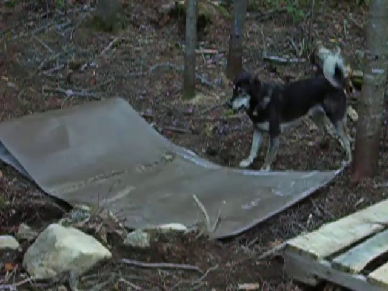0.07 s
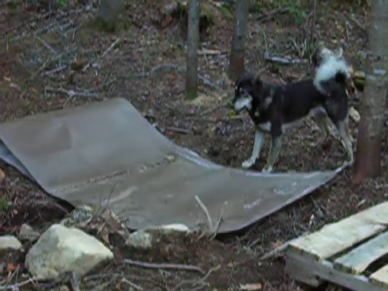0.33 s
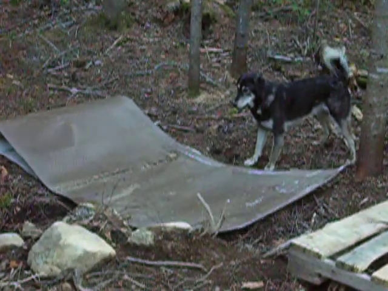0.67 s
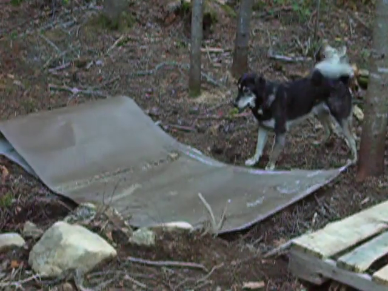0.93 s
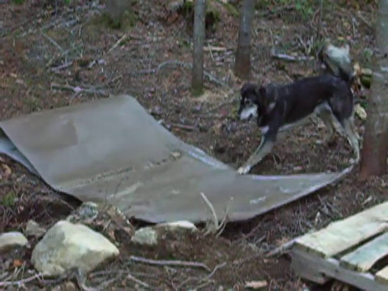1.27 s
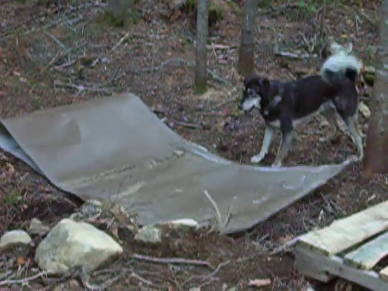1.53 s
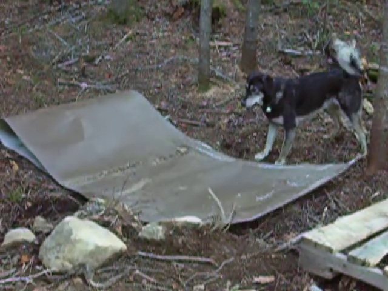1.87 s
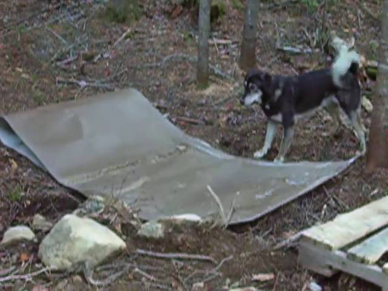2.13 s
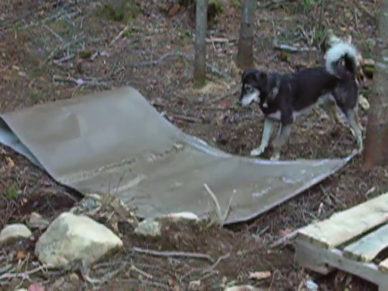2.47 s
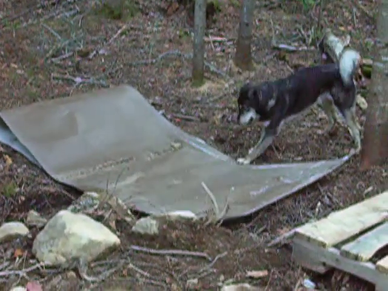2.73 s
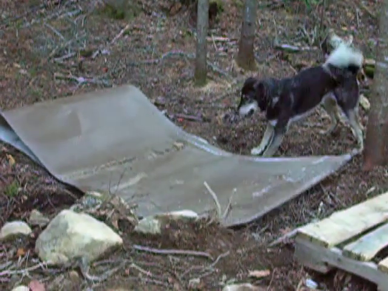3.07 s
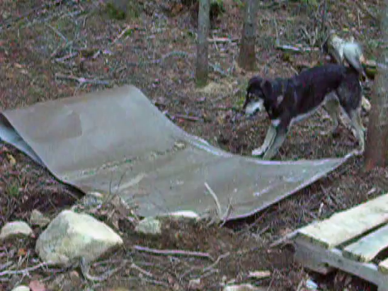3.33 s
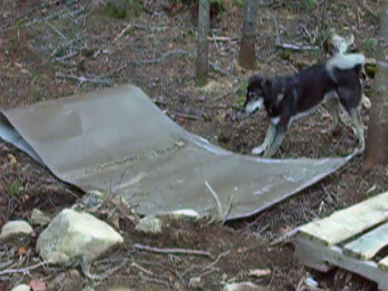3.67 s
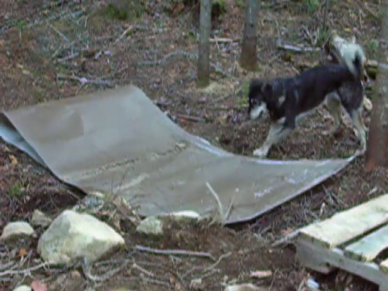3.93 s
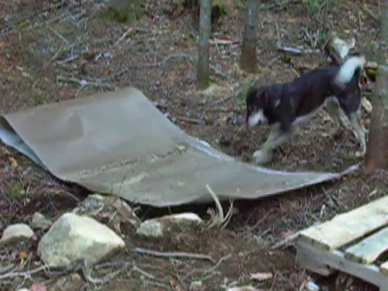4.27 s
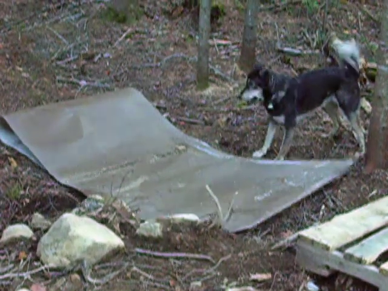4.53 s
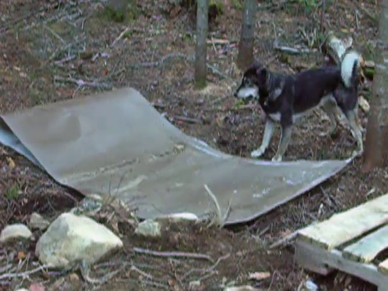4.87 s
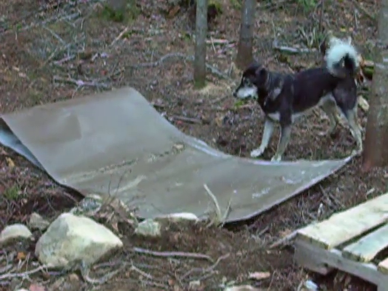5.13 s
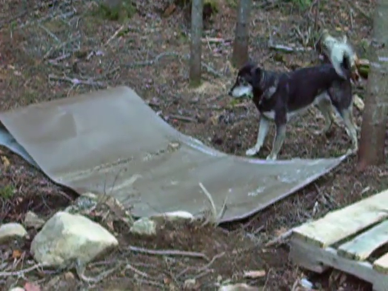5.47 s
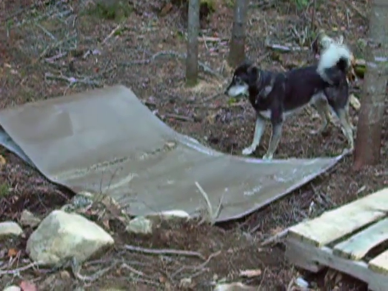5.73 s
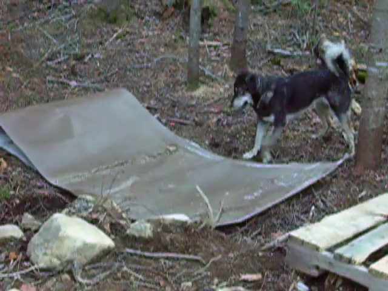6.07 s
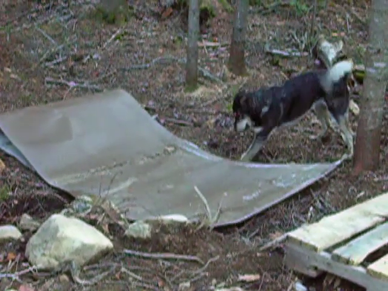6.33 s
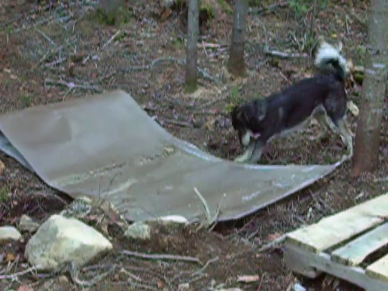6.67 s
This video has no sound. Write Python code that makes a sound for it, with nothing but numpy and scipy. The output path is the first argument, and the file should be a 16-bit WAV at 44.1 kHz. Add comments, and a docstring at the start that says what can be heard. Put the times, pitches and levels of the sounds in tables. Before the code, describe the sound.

A dog paws at a large thin metal sheet on the ground in a quiet wood. Each push brings thuds and short clangs, then a wobbling rumble like stage thunder that rings out. The bursts come four times with short lulls, the fourth loudest and longest, and one more clang comes at the end. A few twigs crack faintly. The microphone sounds dull, with a steady hiss and a few thin clicks.

```python
"""A large, thin, bowed metal sheet rumbles like stage thunder as a dog paws at it on the ground.
Each push makes the plate buckle and excites its dense bending modes, which glide in pitch and ring out.
Claws and edges strike it, and each impact sets the same modes ringing as a thud and a short clang.
Twigs crack under the paws, over the steady hiss of the still air of a wood and of the microphone,
which is narrow in band, overloads on the highest crests and adds a few thin clicks."""
import sys
import numpy as np
from scipy import signal
from scipy.fft import rfft, irfft, next_fast_len
from scipy.io import wavfile
from scipy.ndimage import uniform_filter1d, map_coordinates

SR = 44100
rng = np.random.default_rng(int(sys.argv[2]) if len(sys.argv) > 2 else 0)


def waveform_to_disk(signal):
    """Save audio, clipped to [-1, 1], as 16-bit WAV at the path in sys.argv[1]."""
    frames = np.transpose(np.atleast_2d(signal))
    scaled = np.clip(frames, -1, 1) * 32767
    samples = np.round(scaled).astype(np.int16)
    wavfile.write(sys.argv[1], SR, samples)


N = 295470
TIME = np.arange(N) / SR
RING_SAMPLES, CUTOFF_HZ = 36000, 15800

# Still air and microphone hiss. Each row: frequency in Hz, relative spectral density in dB.
HISS_SPECTRUM = [(20, -6.5), (55, -4.5), (85, 4.5), (130, 0), (220, 2.5), (380, 5), (800, 1), (1800, -2.5),
                 (3200, -3), (3800, -8.5), (4200, -21)]
# Thin, bright clicks. Each row: start in seconds, step height in dB.
CLICK_STEPS = [(3.387, -21), (4.57, -25), (4.639, -36), (4.692, -25.5)]
# Twigs cracking under the paws. Each row: start in seconds, relative level in dB.
TWIG_CRACKS = [(0.9694, -47), (2.5994, -58), (2.7164, -42), (2.8877, -33), (2.9024, -41), (6.3024, -47)]
# Damping of the sheet's modes. Each row: frequency in Hz, time to decay by 60 dB in seconds.
DECAY_TIMES = [(100, 0.91), (400, 1), (900, 0.76), (1500, 0.75), (3500, 0.4)]
# Four spectral envelopes of the sheet. Each row: frequency in Hz, relative mode strength in dB.
THUD_SPECTRUM = [(60, -32.5), (140, -12.5), (220, -7), (320, -8.5), (400, -4), (520, -1), (680, -3),
                 (820, 3), (1000, -2), (1200, -11), (1800, -26), (4000, -50)]
CLANG_SPECTRUM = [(500, -17), (1000, 2.5), (1400, 9.5), (1900, 0), (2450, 6.5), (2900, 5), (3200, 3),
                  (3700, -5), (4300, -22.5)]
BOOM_SPECTRUM = [(50, -29.5), (75, -34.5), (105, -7.5), (170, 1.5), (210, 3), (250, 5), (300, 3.5),
                 (380, -51)]
RUMBLE_SPECTRUM = [(230, -22.5), (290, -13.5), (350, 3), (450, 1), (560, 0), (680, -6.5), (790, -0.5),
                   (950, -4.5), (1080, -15), (1250, -21), (1400, -25), (1800, -39.5), (2500, -39),
                   (4200, -53.5)]
# Claws and edges striking the sheet. Each row: start in seconds, relative clang level in dB,
# relative thud level in dB, rise time in seconds, clang tilt in dB per octave.
IMPACTS = [(0.0, -34, -42, 0.0026, -6), (.032, -36.5, -30, 0.01, -3), (.418, -39, -25.5, 0.0058, -.5),
           (0.693, -53, -32, 0.0086, 4), (1.495, -53.5, -37.5, 0.0036, 2.5),
           (1.528, -30, -24.5, 0.012, 2.5), (1.552, -33, -18.5, 0.0052, -3), (1.641, -23.5, -29, .005, 8.5),
           (1.657, -29.5, -19.5, 0.0035, 1), (1.88, -33.5, -19, .002, 1), (2.012, -40, -35.5, 0.004, 5),
           (2.097, -39.5, -37, 0.0081, -1.5), (3.001, -56.5, -32, 0.015, 1),
           (3.032, -29, -19.5, 0.008, 0.5), (3.056, -32, -14, 0.0015, 1.5),
           (3.16, -30.5, -15, 0.0074, -0.5), (3.385, -36, -26, 0.00083, -.5),
           (3.597, -34.5, -31, 0.0055, -2), (3.786, -42.5, -27, 0.00203, 2),
           (4.428, -24.5, -11.5, 0.012, -1), (4.565, -19.5, -5.5, 0.0032, -3.5),
           (4.588, -26, -14.5, 0.0042, -0.5), (4.622, -32.5, -10.5, 0.0034, -8.5),
           (4.803, -32, -9.5, 0.0065, -1.5), (4.93, -33, -14.5, 0.0089, -2), (5.046, -33, -37, .002, 1),
           (5.215, -44.5, -19, .006, 6.5), (5.541, -43, -30, 0.0087, 2), (6.552, -62, -31.5, 0.0013, -3),
           (6.5671, -22.5, -19, 0.0018, -3)]
# The paws bend the sheet, lean in and let go. Each row: start and length in seconds, rumble and boom
# levels in dB, growth while held in dB per second, decay of the rumble on release in dB per second.
PAW_PUSHES = [(0.02, 0.063, -20.5, -32, -5, 65.5), (1.55, 0.18, -20, -30.5, 2, 33),
              (1.96, .31, -19, -31, -3, 86), (3.164, 0.53, -20, -30, 1, 68.5),
              (4.434, .77, -17.5, -29.5, 2, 76)]
# A bulge flips over and the sound swells briefly.
# Each row: crest time and half-width in seconds, rumble and boom levels in dB.
BULGE_FLIPS = [(0.047, 0.0052, -13.5, -22), (0.064, 0.046, -26, -28.5), (0.164, 0.0057, -24.5, -30),
               (1.567, 0.036, -17, -25.5), (1.8, 0.012, -24.5, -25), (1.973, .025, -29.5, -29),
               (2.022, 0.049, -17.5, -37), (2.207, 0.035, -25, -37), (3.073, 0.035, -15.5, -25),
               (3.206, 0.074, -18, -34), (3.507, 0.053, -13.5, -49), (3.653, 0.028, -22.5, -38),
               (3.7, .018, -20.5, -28.5), (4.456, .022, -18.5, -19.5), (4.579, 0.0082, -9.5, -30),
               (4.657, 0.038, -13.5, -27), (4.682, 0.0084, -12, -20.5), (4.848, .022, -15, -37.5),
               (5.139, 0.026, -15, -29.5), (6.59, 0.01, -34, -34)]


def from_db(db):
    """Amplitude grows tenfold for every 20 dB."""
    return 10 ** (np.asarray(db) / 20)


def unit_power(x):
    """Dividing a signal by its root mean square gives it unit power."""
    return x / np.sqrt(np.mean(x ** 2) + 1e-20)


def at_hz(table, hz):
    """Interpolation on a logarithmic frequency axis treats equal ratios as equal steps."""
    known_hz, values = np.transpose(table)
    return np.interp(np.log(hz + 1e-9), np.log(known_hz), values)


def drift(rate_hz):
    """Low-pass filtered noise wanders smoothly, here with unit spread."""
    hop, settling = 100, 1000
    pole = np.exp(-2 * np.pi * rate_hz * hop / SR)
    noise = rng.standard_normal(N // hop + settling + 2)
    slow = signal.lfilter([1], [1, -2 * pole, pole * pole], noise)[settling:]
    return np.interp(np.arange(N) / hop, np.arange(len(slow)), unit_power(slow))


def hiss(level_db):
    """Stationary noise: a fixed spectrum gives the air and the microphone a steady hiss."""
    size = next_fast_len(N)
    colour = from_db(at_hz(HISS_SPECTRUM, np.fft.rfftfreq(size, 1 / SR)))
    noise = irfft(rfft(rng.standard_normal(size)) * colour, size)[:N]
    return from_db(level_db) * unit_power(noise)


def pulses(events, decay_s):
    """Exponential decay: each event jumps to its level, then falls by a factor e every decay_s."""
    return sum(from_db(db) * (TIME >= s) * np.exp(-np.abs(TIME - s) / decay_s) for s, db in events)


def clicks():
    """A brief pulse has a broad spectrum: a step that dies at once is heard as a thin click."""
    return pulses(CLICK_STEPS, decay_s=0.00033)


def twigs(band_hz, gain_db):
    """Brittle fracture in dry litter gives tiny, heavily damped bursts of noise."""
    cracks = pulses(TWIG_CRACKS, decay_s=0.0065) * rng.standard_normal(N)
    band = signal.butter(2, band_hz, "band", fs=SR, output="sos")
    return from_db(gain_db) * signal.sosfilt(band, cracks)


def sheet_modes(spacing_hz):
    """A thin plate has constant modal density, and each mode vibrates as a damped sine."""
    grid = np.arange(42, CUTOFF_HZ, spacing_hz)
    hz = grid + spacing_hz * rng.uniform(-0.52, 0.41, len(grid))
    t = np.float32(TIME[:RING_SAMPLES])
    damping = np.log(1000) / at_hz(DECAY_TIMES, hz)
    sines = np.sin(np.outer(np.float32(2 * np.pi * hz), t))
    return hz, sines * np.exp(np.outer(np.float32(-damping), t))


def impulse_responses(modes, spectrum, count, tilt_db=0):
    """Modal superposition: each spot on the sheet rings with its own mix of the same modes."""
    hz, sines = modes
    strengths = rng.uniform(-0.97, 1, (count, len(hz))) * from_db(at_hz(spectrum, hz) + tilt_db)
    strengths /= np.sqrt(np.sum(strengths ** 2, axis=1, keepdims=True) / 2)  # unit power at the start
    return np.float32(strengths) @ sines


def bass_cut_and_notch(x, bass_hz, notch_hz, notch_q, notch_share):
    """A high-pass filter thins out the deepest bass; interference with the ground echo weakens a band."""
    x = signal.sosfilt(signal.butter(4, bass_hz, "high", fs=SR, output="sos"), x)
    notched = signal.lfilter(*signal.iirnotch(notch_hz, notch_q, fs=SR), x)
    return x + notch_share * (notched - x)


def strikes(modes):
    """Impact excitation: the low modes answer each blow with a thud, the high ones with a clang."""
    out, t = np.zeros(N), TIME[:RING_SAMPLES]
    hz, _ = modes
    tilts_db = np.outer(np.array(IMPACTS)[:, 4], np.log2(hz / 2200))
    clangs = impulse_responses(modes, CLANG_SPECTRUM, len(IMPACTS), tilts_db)
    thuds = impulse_responses(modes, THUD_SPECTRUM, len(IMPACTS))
    # the first wave fronts are the strongest; the paw then damps the sheet
    clang_fade = (1 + 0.27 * np.exp(-t / 0.1)) * from_db(-18 * t)
    thud_fade = (1 + 0.84 * np.exp(-t / 0.012)) * from_db(-22 * t)
    for (start_s, clang_db, thud_db, rise_s, _), clang, thud in zip(IMPACTS, clangs, thuds):
        ring = from_db(clang_db) * clang * clang_fade + from_db(thud_db - 4) * thud * thud_fade
        # a soft, sliding contact takes longer to build up the ring
        attack = 1 - np.exp(-(t / rise_s) ** 1.5)
        start = round(start_s * SR)
        out[start:start + RING_SAMPLES] += (attack * ring)[:N - start]
    return out


def flexing(onset_db_per_s, boom_fade_share):
    """Incoherent sounds add in power: pushes and bulge flips sum to the rumble and boom envelopes."""
    power = np.zeros((2, N))
    for start, length, rumble_db, boom_db, growth_db_per_s, decay_db_per_s in PAW_PUSHES:
        age = TIME - start
        held_db = onset_db_per_s * np.minimum(age, 0) + growth_db_per_s * np.clip(age, 0, length)
        fade_db = decay_db_per_s * np.maximum(age - length, 0)
        power[0] += from_db(rumble_db + held_db - fade_db) ** 2
        power[1] += from_db(boom_db + held_db - boom_fade_share * fade_db) ** 2  # low modes ring longer
    for crest, half_width, rumble_db, boom_db in BULGE_FLIPS:
        swell = np.exp(-np.minimum(((TIME - crest) / half_width) ** 2, 60))
        power += (from_db([[rumble_db], [boom_db]]) * swell) ** 2
    return np.sqrt(power)


def buckling(modes, spectrum, envelope, pops_per_s, spread_db, even_s):
    """Elastic instability: small buckles pop at random all over the sheet and keep its modes ringing."""
    out = np.zeros(N)
    spots = impulse_responses(modes, spectrum, count=6)
    for ring in spots:
        popped = rng.random(N) < pops_per_s / len(spots) / SR
        sizes = from_db(spread_db * rng.standard_normal(N)) * rng.choice([-1, 1], N)
        out += signal.oaconvolve(popped * sizes * envelope, ring)[:N]
    # even out the short-term power to 1
    width = int(even_s * SR)
    power = uniform_filter1d(uniform_filter1d(out ** 2, width), width)
    return out / np.sqrt(np.abs(power) + 1e-14)


def pitch_glide(x, envelope, depth, rate_hz):
    """Geometric nonlinearity: bending changes the stiffness, so the modes glide during wide swings."""
    stretch = depth * drift(rate_hz) * np.sqrt(envelope / envelope.max())
    shift_samples = signal.lfilter([1], [1, -np.exp(-10 / SR)], stretch)  # leaky integral
    return map_coordinates(x, [np.arange(N) + shift_samples], order=3, mode="nearest")


def thunder(modes):
    """Forced vibration of the flexing sheet: a boom, a rumble and a shimmer that grows with the swing."""
    swing, low_swing = flexing(onset_db_per_s=519, boom_fade_share=0.73)
    rumble = buckling(modes, RUMBLE_SPECTRUM, swing, pops_per_s=400, spread_db=3.5, even_s=0.026)
    boom = buckling(modes, BOOM_SPECTRUM, low_swing, pops_per_s=120, spread_db=1.5, even_s=0.14)
    shimmer = buckling(modes, CLANG_SPECTRUM, swing, pops_per_s=460, spread_db=9.5, even_s=0.043)
    rumble = swing * pitch_glide(rumble, swing, depth=0.0259, rate_hz=5)
    boom = low_swing * pitch_glide(boom, low_swing, depth=0.048, rate_hz=5)
    return rumble + boom + from_db(-31) * swing ** 0.69 * shimmer


def scene():
    """Linear superposition: the sheet, the twigs and the hiss add in one channel."""
    modes = sheet_modes(spacing_hz=7)
    vibration = thunder(modes) + strikes(modes)
    sheet = bass_cut_and_notch(vibration, bass_hz=86.5, notch_hz=290.3, notch_q=5.1, notch_share=0.36)
    return (sheet + twigs(band_hz=(400, 2700), gain_db=0.5) + hiss(level_db=-48))[None]


def record(dry):
    """Saturation and band limiting: the microphone rounds crests, cuts treble, adds clicks and clips."""
    ceiling, full_scale, offset, band_hz = 0.63, 0.71, -0.054, 4050
    rounded = dry / (1 + (dry / ceiling) ** 8) ** (1 / 8)
    narrow = signal.sosfilt(signal.ellip(8, 0.2, 90, band_hz, fs=SR, output="sos"), rounded)
    # the signal rests a little below zero, so the troughs clip first
    clipped = np.clip(narrow + clicks(), -full_scale - offset, full_scale - offset)
    return signal.sosfilt(signal.cheby2(12, 70, CUTOFF_HZ, fs=SR, output="sos"), clipped) + offset


dry = scene()
out = record(dry)
waveform_to_disk(out)
```